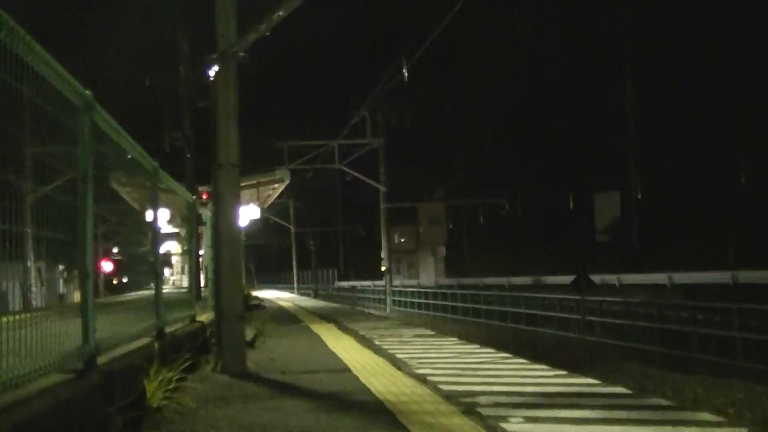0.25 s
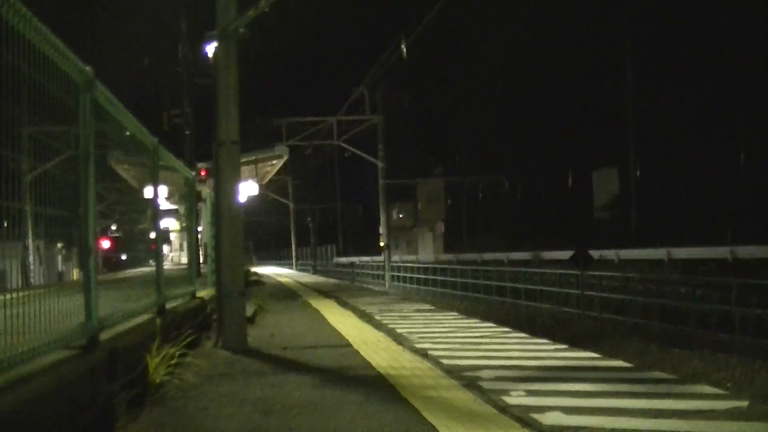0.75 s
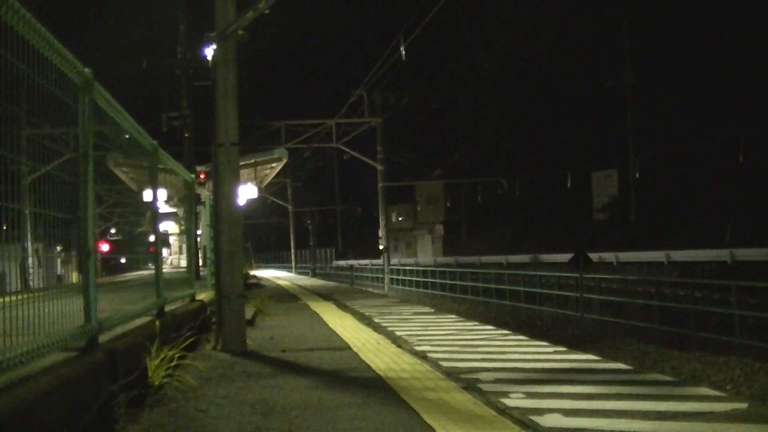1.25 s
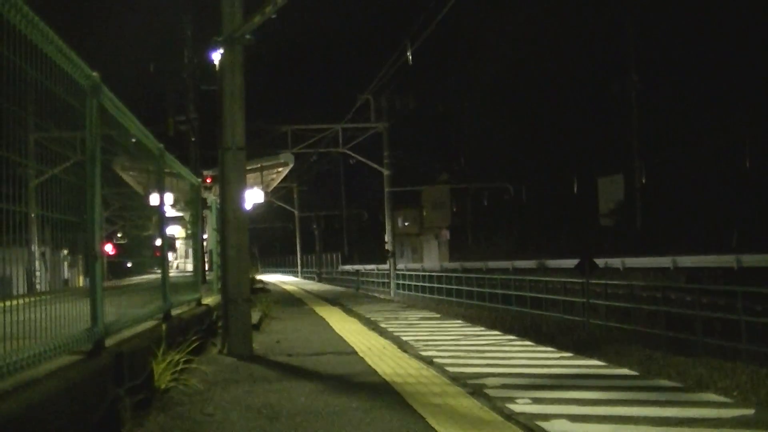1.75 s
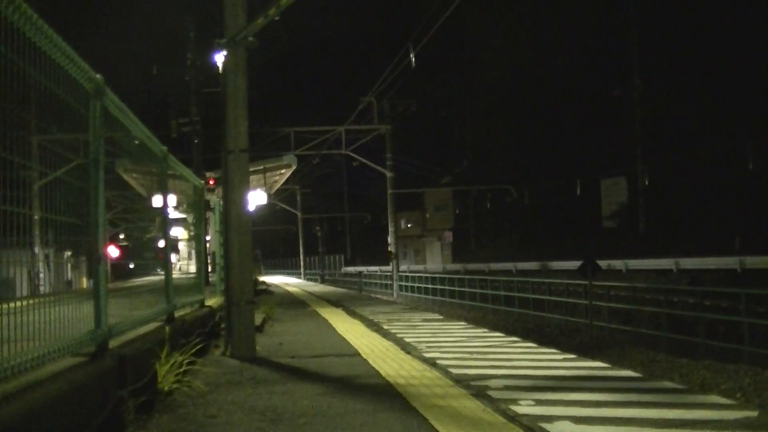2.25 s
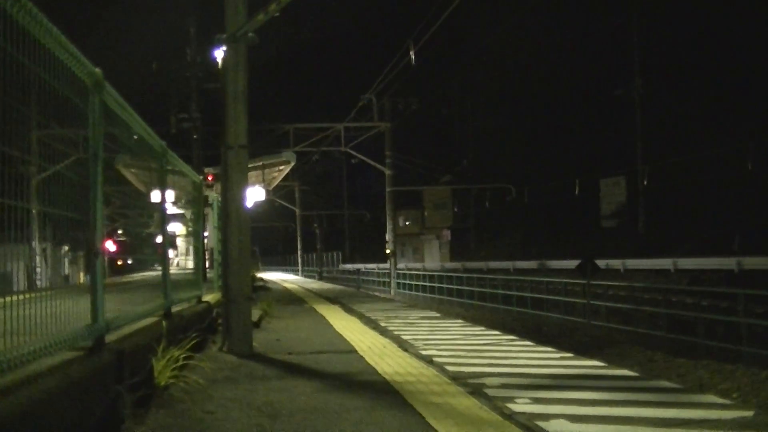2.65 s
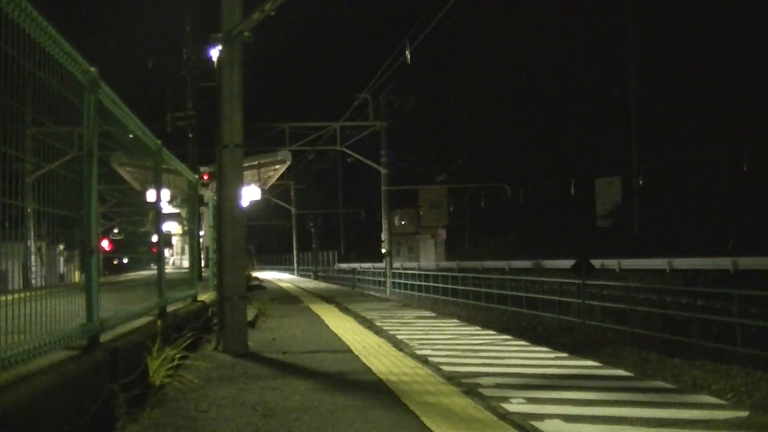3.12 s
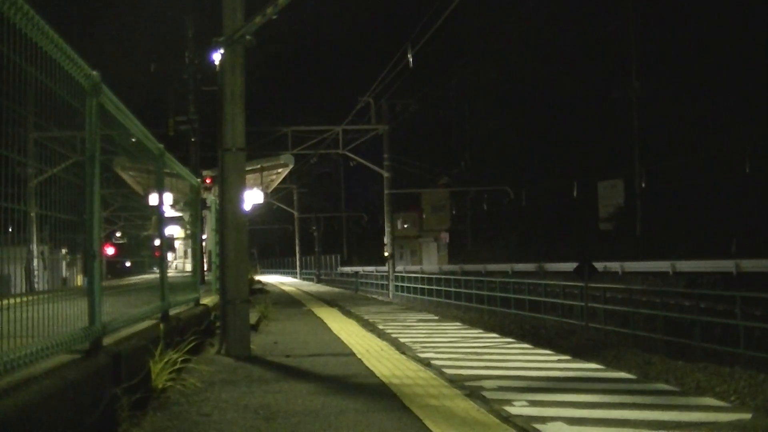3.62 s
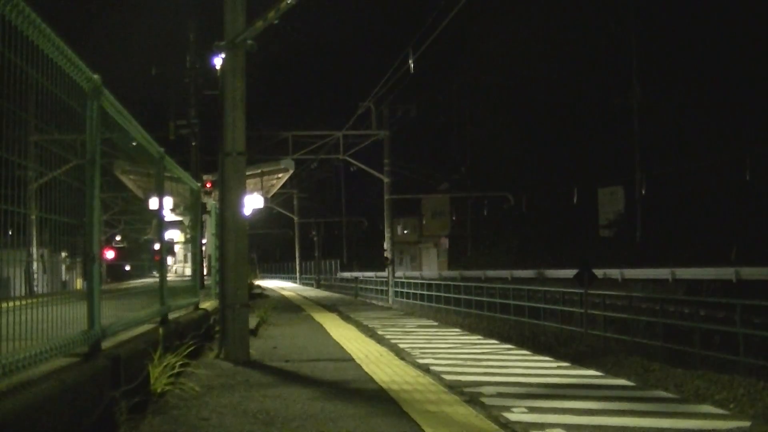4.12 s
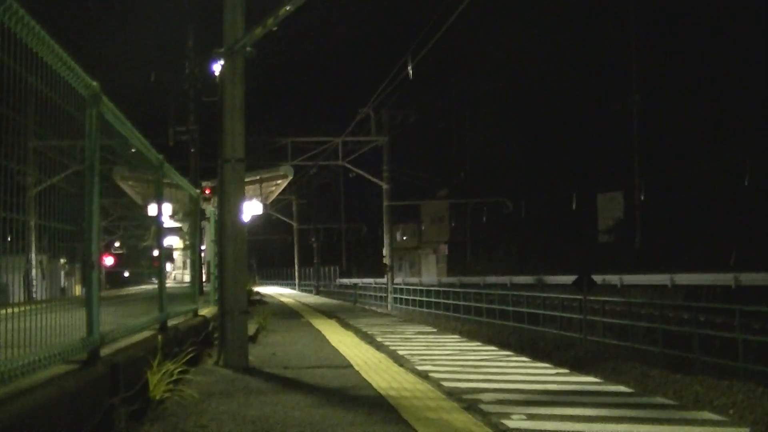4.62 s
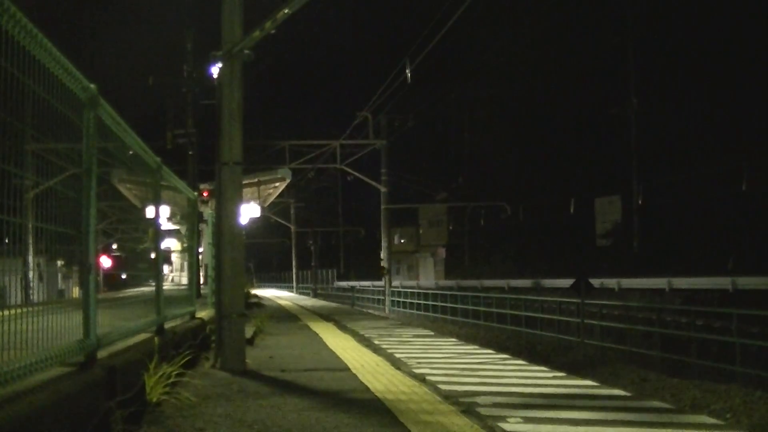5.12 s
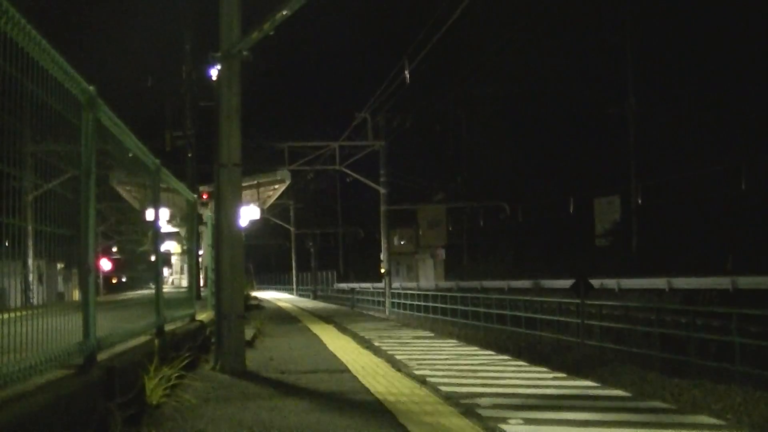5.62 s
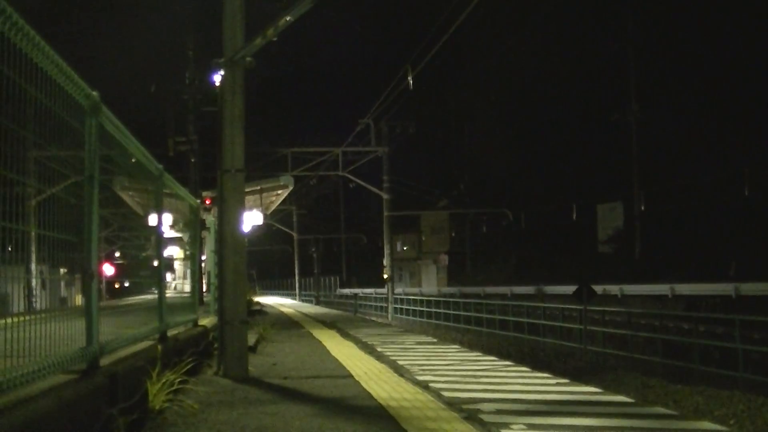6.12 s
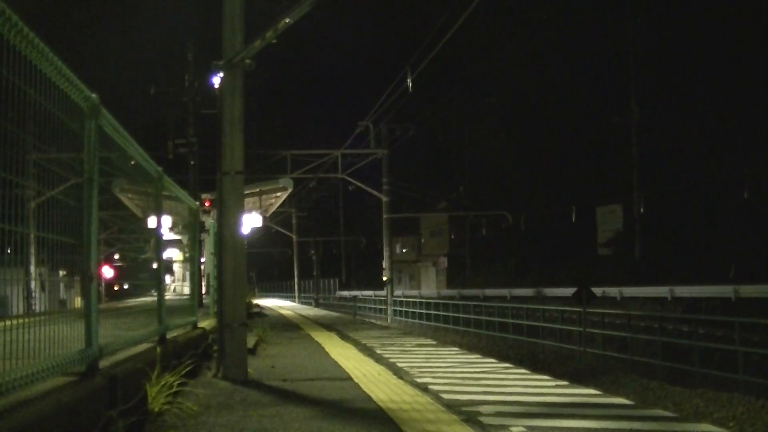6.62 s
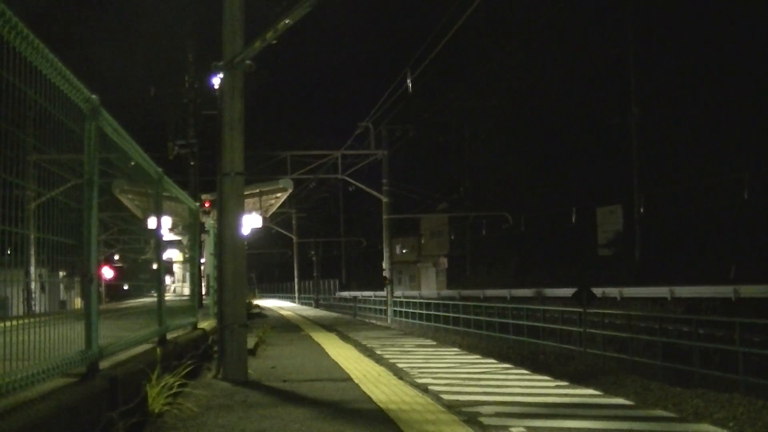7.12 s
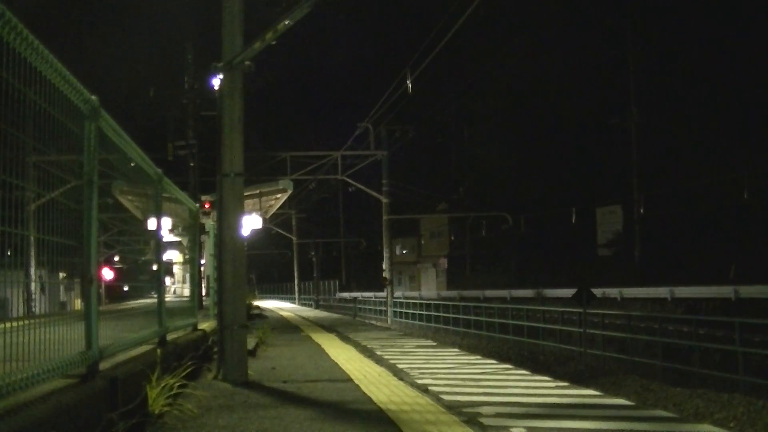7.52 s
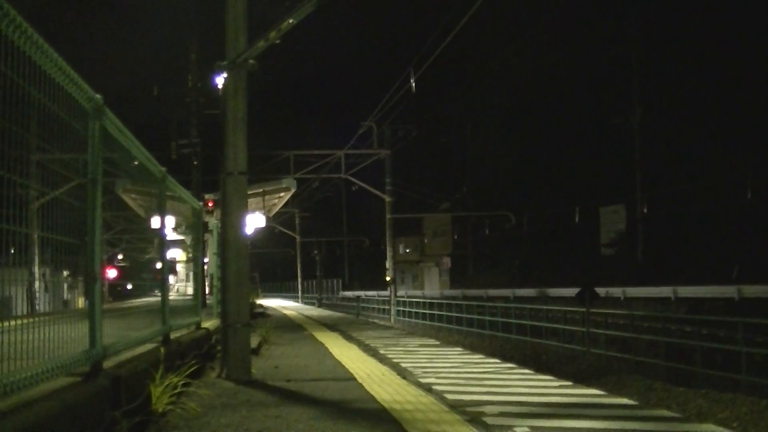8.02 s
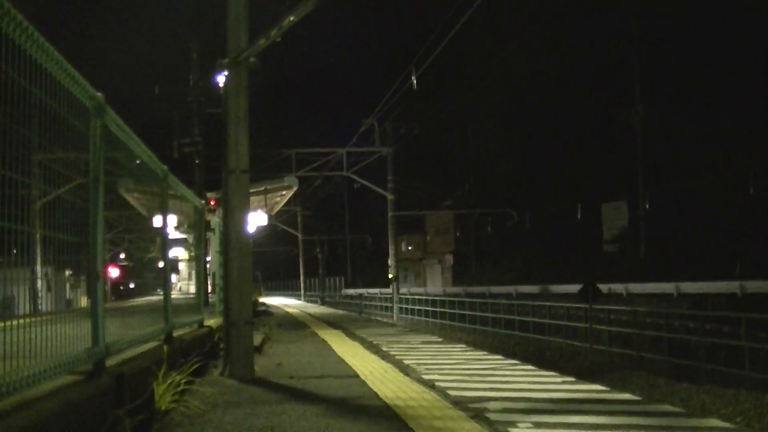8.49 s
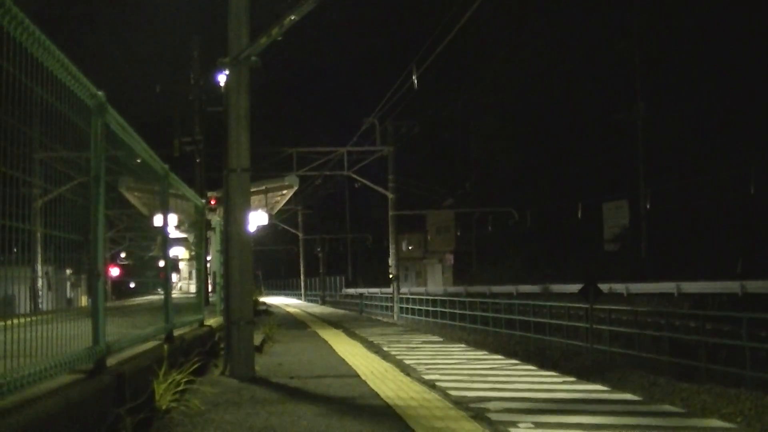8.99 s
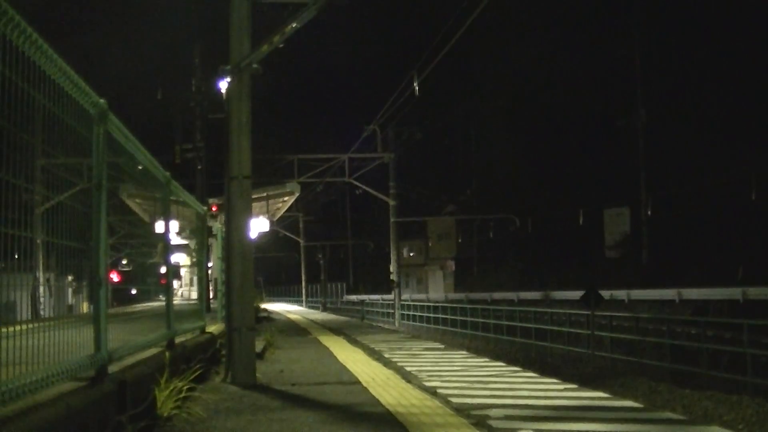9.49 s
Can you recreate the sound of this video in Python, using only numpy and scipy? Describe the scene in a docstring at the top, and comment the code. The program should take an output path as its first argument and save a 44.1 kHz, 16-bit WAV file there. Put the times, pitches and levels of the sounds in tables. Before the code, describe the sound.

A steady autumn-night insect scene lasts about 9.75 seconds, outdoors beside a quiet platform. The closest cricket sings high around 5.5 kHz, with chirps of six to ten evenly pulsed, slightly rising strokes roughly every 0.3 seconds. It is strongest until about 6 seconds, fades to its weakest near 8.3, then partly recovers around 9.3. Beneath it, a field cricket near 3.8 kHz repeats rapid runs of falling strokes over four times a second, while a soft 3 kHz trill stutters continuously. Distant crickets merge into a shimmering band. Very thin high rasps persist, with the topmost layers stopping around 7.3 seconds. Far traffic rumbles low, fuller at first and ebbing over two seconds, its drone gently swelling throughout. Faint ticks come near 0, 1.5 and 2 seconds, with a soft bump and scuff around 0.4 to 0.5.

```python
"""Crickets by an empty country platform

Autumn night, two close microphones: a near cricket chirps around 5.5 kHz in front of a far chorus.
A field cricket repeats quick runs of falling strokes, a tree cricket trills at 3 kHz; both are rows of gliding tones.
Bush crickets buzz thinly on top, as pulsed noise through resonances. Far traffic, coloured noise, rumbles below.
A few faint ticks and scuffs, fading bursts of filtered noise, sound close to the microphone."""
import sys
import numpy as np
from scipy import signal
from scipy.fft import rfft, irfft
from scipy.io import wavfile

SR = 44100
rng = np.random.default_rng(int(sys.argv[2]) if len(sys.argv) > 2 else 0)


def dump_mix(stems):
    """Bounce the given channels to the path in sys.argv[1] as a 16-bit WAV at rate SR."""
    frames = np.atleast_2d(stems).T  # one column per channel
    limited = np.clip(frames, -1, 1)  # hard clip at full scale
    pcm = np.round(limited * 32767).astype(np.int16)
    wavfile.write(sys.argv[1], SR, pcm)


N = 429975

# Colours of the far traffic and the air: (frequency [Hz], relative density [dB])
RUMBLE_SPECTRUM = [(20, -20), (32, -17), (50, 1.5), (72, 0), (120, 1), (170, -0.5), (210, -2.5), (300, -44)]
DRONE_SPECTRUM = [(190, -25.5), (232, -1), (260, 1), (330, -2.5), (390, -5.5), (450, -16), (600, -35)]
WASH_SPECTRUM = [(330, -1), (470, 1.5), (600, 0), (730, 0.5), (1000, -5), (1250, -10), (1700, -12),
                 (2600, -15.5), (5000, -18.5)]
AIR_SPECTRUM = [(1500, -31), (3000, 8), (4500, -1.5), (6500, 4), (7400, 1.5), (9500, -1.5), (13000, -2),
                (14500, -5.5), (15700, 0)]
# Countless distant crickets merged into one band: (frequency [Hz], relative density [dB])
SWARM_SPECTRUM = [(4350, -61), (4650, -16), (4930, -18.5), (5100, -14), (5280, 0), (5450, -18.5), (5620, 2),
                  (5780, -13), (5930, -21.5), (6250, -33)]
# Likeness of noise at the left and right microphones: (frequency [Hz], correlation [0-1])
LIKENESS = [(40, .87), (90, .89), (180, .965), (350, .98), (700, .94), (1300, .83), (2400, .8), (4400, .94),
            (8000, .91), (15000, .96)]
# Tyre drone of passing vehicles: (loudest moment [s], time to fall to 1/e in power [s], peak level [dB])
SWELLS = [(0.133, 0.14, -42.5), (1.045, 0.24, -44), (2.1, 0.3, -45), (3.51, 0.23, -45), (4.4, 0.38, -42.5),
          (4.8, 0.13, -42.5), (6.0, 0.15, -51), (6.6, 0.3, -43.5), (7.146, 0.1, -43), (7.6, 0.22, -48.5),
          (8.67, 0.054, -43.5), (9.298, 0.54, -46.5)]
# Far crickets, plus a faint pulsing line near 5.1 kHz (fifth row): (pitch [Hz], stroke rate [1/s], # chirp rate
# [1/s], mid-way level [dB], rise start to end [dB])
CHORUS = [(5605, 40.2, 3.3, -49, 0), (5560, 31, 4.2, -56, 0), (5450, 36.6, 2.8, -53, 7),
          (5760, 38.5, 3.5, -59, 0), (5090, 36, 3.4, -64, 2), (3403, 43.0, 2.6, -68, 0)]
# Bush crickets: (start [s], end [s], pitch [Hz], width of each resonance [Hz], stroke rate [1/s],
# pulsing up and down [dB], level [dB])
BUZZES = [(0, 3.25, 9950, 1700, 33.5, 4, -69), (3.2, 5.3, 9900, 2200, 32.3, 4, -71),
          (0, 7.3, 11030, 350, 33.5, 3, -80), (5.3, 7.27, 10750, 1200, 33.5, 4, -72.5),
          (0, 9.75, 8200, 900, 18.3, 1.5, -70), (0, 9.75, 7985, 150, 36.6, 2.5, -77)]
# Ticks, scuffs and a soft bump, before the treble cut: (onset [s], onset level [dB], centre [Hz],
# width of each resonance [Hz], decay time constant [s])
TICKS = [(.014, -32.5, 2830, 1700, 0.0034), (.385, -51, 1500, 1800, 0.062), (0.493, -35.5, 490, 298, 0.028),
         (0.503, -48, 1400, 2200, 0.02), (1.474, -44.5, 1800, 2000, 0.0059),
         (2.041, -37.5, 2980, 2400, 0.004)]
# Slightly drifting pace of the field cricket: (time [s], period from one run to the next [s])
RUN_PERIOD = [(0, .2265), (2.5, .2277), (2.9, .2242), (4.8, .2248), (8.8, .2287), (9.2, .222)]
# Near cricket's chirps: (first stroke centre [s], stroke count)
NEAR_CHIRPS = [(0.132, 6), (.407, 6), (.660, 8), (0.958, 8), (1.260, 7), (1.533, 10), (1.888, 8),
               (2.188, 9), (2.510, 7), (2.781, 10), (3.130, 8), (3.454, 7), (3.731, 8), (4.031, 8),
               (4.324, 8), (4.621, 9), (4.944, 8), (5.248, 7), (5.527, 7), (5.773, 7), (6.049, 9),
               (6.376, 8), (6.709, 7), (7.010, 7), (7.287, 6), (7.564, 7), (7.885, 6), (8.215, 7),
               (8.488, 7), (8.763, 6), (9.036, 7), (9.309, 6), (9.529, 6)]
# Near cricket's loudness before stroke variation, scatter and placing: (time [s], level [dB])
NEAR_LEVEL = [(0, -31.5), (6.1, -32), (8.3, -38), (8.8, -37), (9.35, -32.5), (9.75, -38)]

# Far traffic: levels of the deep rumble, steady tyre drone and wash
RUMBLE_DB, DRONE_DB, WASH_DB = -49.5, -48, -50
# Rumble and wash start this much louder and ebb away with these time constants
RUMBLE_EBB_DB, RUMBLE_EBB_S, WASH_EBB_DB, WASH_EBB_S = 7.5, 1.06, 4.5, 1.9
# Field cricket: stroke level before the ground bounce and scatter, and centre of the first main stroke
RUN_DB, FIRST_RUN_S = -46.5, .1245
# Near cricket: pitch it warms up to, rise within each stroke, time between strokes
NEAR_HZ, NEAR_RISE_HZ, NEAR_STROKE_PERIOD_S = 5478, 90, .0257
CUTOFF_HZ = 15800


def from_db(db):
    """Turn decibels into an amplitude factor."""
    return 10 ** (np.asarray(db) / 20)


def rms_one(x):
    """Scale a signal to an rms of 1."""
    return x / np.sqrt(np.mean(x ** 2) + 1e-20)


def at_hz(points, hz, outside=None):
    """Read a spectrum on a log-frequency axis."""
    f, value = np.transpose(points)
    return np.interp(np.log(hz + 1e-3), np.log(f), value, outside, outside)


def pan(x, left_db):
    """Place a source by making the left channel louder than the right by left_db."""
    return x * from_db(np.array([[left_db], [-left_db]]) / 2)


def drift(rate):
    """Slow random wander through `rate` points per second, with a spread of about 1."""
    knots = rng.standard_normal(2048)
    return np.interp(np.arange(N) / SR * rate, np.arange(len(knots)), knots)


def resonate(x, hz, width_hz):
    """A resonance applied twice, for steep skirts."""
    r = np.exp(-np.pi * width_hz / SR)
    numerator = [(1 - r * r) / 2, 0, -(1 - r * r) / 2]
    denominator = [1, -2 * r * np.cos(2 * np.pi * hz / SR), r * r]
    section = numerator + denominator
    return signal.sosfilt([section, section], x)


def noise(spectrum):
    """Stereo noise of a given colour, largely alike at the two close microphones; rms 1."""
    hz = np.arange(N // 2 + 1) * SR / N
    mid, side = rfft(rng.standard_normal((2, N)))
    alike = np.clip(at_hz(LIKENESS, hz), 0, .995)
    both = np.sqrt(1 + alike) * mid + np.sqrt(1 - alike) * side * [[1], [-1]]
    colour = from_db(at_hz(spectrum, hz, -100))
    return rms_one(irfft(both * colour, N))


def add(out, centre_s, sound):
    """Mix a short sound in, centred on a moment."""
    at = int(centre_s * SR) - len(sound) // 2 + np.arange(len(sound))
    inside = (at >= 0) & (at < N)
    out[at[inside]] += sound[inside]


def stroke(hz, glide_hz, length_s, taper):
    """One wing closure: scraper runs along file, and the wing sings a gliding tone that swells and fades."""
    along = np.linspace(0, 1, int(length_s * SR))
    phase = 2 * np.pi * np.cumsum(hz + glide_hz * (along - .5)) / SR
    swell = np.abs(np.sin(np.pi * along)) ** taper
    return swell * np.sin(phase + 2 * np.pi * rng.random())


def outdoors(x, wet_db, t60, side_db):
    """Direct sound plus dense scatter from fence, platform and trees; the power is roughly kept."""
    t = np.arange(SR // 2) / SR
    decay = from_db(-60 * t / t60) * (t > .002)
    mid, side = rng.standard_normal((2, len(t))) * decay
    echoes = (mid + from_db(side_db) * side * [[1], [-1]]) / np.sqrt(np.sum(mid ** 2))
    wet = from_db(wet_db)
    scatter = signal.fftconvolve(x[None], echoes, axes=1)[:, :N]
    return (x + wet * scatter) / np.sqrt(1 + wet ** 2)


def trill(hz, per_s, glide_hz, length_s, uneven_db, scatter_hz):
    """A long row of strokes at a slightly wandering pace; rms 1."""
    out = np.zeros(N)
    chance = rng.standard_normal((512, 3))
    centres = np.cumsum(1 + .04 * chance[:, 0]) / per_s - .02
    for s, (_, force, detune) in zip(centres, chance):
        gain = from_db(uneven_db * min(force, 1))
        add(out, s, gain * stroke(hz + scatter_hz * detune, glide_hz, length_s, taper=3.5))
    return rms_one(out)


def background(air_db=-63):
    """Far traffic: deep rumble and wash ebb while tyre drone swells and sinks, under a faint even hiss."""
    t = np.arange(N) / SR
    # passing vehicles add to the steady drone in power
    passing = sum(from_db(db) ** 2 * np.exp(-((t - s) / half_s) ** 2) for s, half_s, db in SWELLS)
    drone = np.sqrt(from_db(DRONE_DB) ** 2 + passing)
    rumble = from_db(RUMBLE_DB + RUMBLE_EBB_DB * np.exp(-t / RUMBLE_EBB_S))
    wash = from_db(WASH_DB + WASH_EBB_DB * np.exp(-t / WASH_EBB_S))
    road = rumble * noise(RUMBLE_SPECTRUM) + drone * noise(DRONE_SPECTRUM) + wash * noise(WASH_SPECTRUM)
    return pan(road, left_db=1.0) + from_db(air_db) * noise(AIR_SPECTRUM)


def chorus(swarm_db=-51):
    """Far trills swell gently, each at its own chirp pace, and scatter blurs them into a shimmer."""
    out, t = np.zeros(N), np.arange(N) / SR
    for hz, per_s, chirps_per_s, db, rise_db in CHORUS:
        chirping = np.sin(2 * np.pi * (chirps_per_s * t + rng.random() + 0.14 * drift(1.45)))
        swell = from_db(np.tanh(2 * chirping))  # within 1 dB up and down
        song = swell * trill(hz, per_s, glide_hz=-130, length_s=.013, uneven_db=2, scatter_hz=22)
        out += from_db(db + rise_db * np.linspace(-.5, .5, N)) * rms_one(song)
    singers = outdoors(out, wet_db=1.5, t60=0.51, side_db=-12.5)
    return pan(singers + from_db(swarm_db) * noise(SWARM_SPECTRUM), left_db=0.4)


def bush_crickets(fade_s=0.059):
    """Stiff, damped wings give a thin rasp instead of a tone, pulsing with the strokes."""
    out, t = np.zeros(N), np.arange(N) / SR
    for start, end, hz, width_hz, per_s, pulse_db, db in BUZZES:
        strokes = from_db(pulse_db * np.sin(2 * np.pi * (per_s * t + 0.16 * drift(3.3))))
        singing = np.clip(np.minimum(t - start, end - t) / fade_s + .5, 0, 1)
        rasp = rms_one(strokes * resonate(rng.standard_normal(N), hz, width_hz))
        out += from_db(db) * singing * rasp
    return pan(outdoors(out, wet_db=-5.0, t60=.2, side_db=-9.0), left_db=-1.0)


def ticks(top_hz=4800):
    """Short, dull, dry ticks and scuffs close to the microphone: resonant noise that starts at once and fades."""
    out, t = np.zeros(N), np.arange(N) / SR
    for s, db, hz, width_hz, decay_s in TICKS:
        fade = (t >= s) * np.exp(-np.abs(t - s) / decay_s)
        out += from_db(db) * fade * rms_one(resonate(rng.standard_normal(N), hz, width_hz))
    out = signal.sosfilt(signal.butter(6, top_hz, fs=SR, output="sos"), out)
    return outdoors(out, wet_db=-26, t60=0.18, side_db=-7)


def tree_cricket(hz=2985, period_s=0.022, length_s=0.011, start_db=-46.5, end_db=-46, far_db=-63, far_rise_db=4):
    """A low trill that stutters: a few even strokes, one left out. Far neighbours blur into a faint line."""
    run_lengths = rng.choice([2, 3, 3, 3, 5], 160)
    strokes = np.concatenate([[1] * run + [0] for run in run_lengths])
    out = np.zeros(N)
    for k in np.flatnonzero(strokes):
        late, detune, force = rng.standard_normal(3)
        tone = stroke(hz + 18 * detune, 50, length_s, taper=1.6)
        add(out, k * period_s + .0006 * late, from_db(.5 * force) * tone)
    near = outdoors(out, wet_db=-14, t60=.2, side_db=-5) * from_db(np.linspace(start_db, end_db, N))
    far = trill(3020, per_s=39.0, glide_hz=-150, length_s=.008, uneven_db=-1.5, scatter_hz=46)
    far = outdoors(far, wet_db=10.5, t60=0.3, side_db=-25)
    far *= from_db(far_db + np.linspace(0, far_rise_db, N))
    return pan(near + far, left_db=2.0)


def run_starts():
    """Each run of the field cricket follows the last after one period."""
    starts = [FIRST_RUN_S]
    while starts[-1] < N / SR:
        period_s = np.interp(starts[-1], *np.transpose(RUN_PERIOD))
        starts.append(starts[-1] + period_s)
    return starts


def field_cricket(hz=3790, glide_hz=-700, spacing_s=.0193, length_s=.0175,
                  lead_in_db=-7, ground_db=-10, slip_db=-4):
    """A soft lead-in, then six strokes that fall in pitch as the wing slows; now and then one catches weakly."""
    out = np.zeros(N)
    for start in run_starts():
        for k, (force, detune, late, grip) in enumerate(rng.standard_normal((7, 4)), -1):
            # stroke -1 is the lead-in
            gain = from_db(RUN_DB + lead_in_db * (k < 0) + slip_db * (grip > 1.7) + .8 * force)
            tone = stroke(hz + 40 * detune, glide_hz, length_s, taper=0.28)
            add(out, start + k * spacing_s + .0006 * late, gain * tone)
    # the bounce off the ground comes just late enough to hollow out the middle of each sweep
    bounce = np.roll(out, int(.00332 * SR))
    scattered = outdoors(out + from_db(ground_db) * bounce, wet_db=-6, t60=.38, side_db=-9)
    return pan(scattered, left_db=-2.0)


def near_cricket(warm_up_hz=70, first_db=-3.5, length_s=.0165, uneven_db=0.5):
    """Evenly paced rising strokes; each chirp starts soft and flat, then reaches full force and pitch."""
    out = np.zeros(N)
    for start, strokes in NEAR_CHIRPS:
        db = np.interp(start, *np.transpose(NEAR_LEVEL))
        for k in range(round(strokes)):
            force, detune, late = rng.standard_normal(3)
            pitch = NEAR_HZ - warm_up_hz * np.exp(-k / 2) + 10 * detune
            gain = from_db(db + first_db * np.exp(-2 * k) + uneven_db * force)
            tone = stroke(pitch, NEAR_RISE_HZ, length_s, taper=0.93)
            add(out, start + k * NEAR_STROKE_PERIOD_S + .0004 * late, gain * tone)
    return pan(outdoors(out, wet_db=-11.5, t60=0.11, side_db=-9), left_db=-1.5)


def scene():
    """All sources together, from the far road to the near cricket."""
    far = background() + chorus() + bush_crickets()
    return far + ticks() + tree_cricket() + field_cricket() + near_cricket()


def record(dry):
    """The top is cut steeply."""
    return signal.sosfilt(signal.ellip(12, .1, 80, CUTOFF_HZ, fs=SR, output="sos"), dry)


dry = scene()
out = record(dry)
dump_mix(out)
```